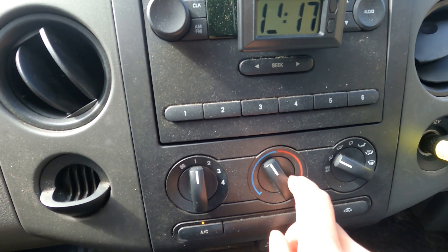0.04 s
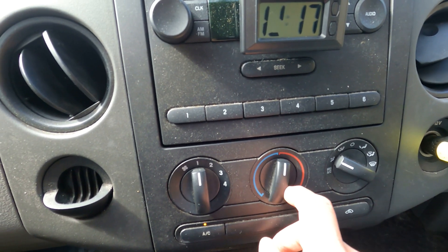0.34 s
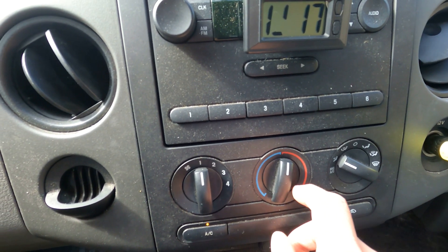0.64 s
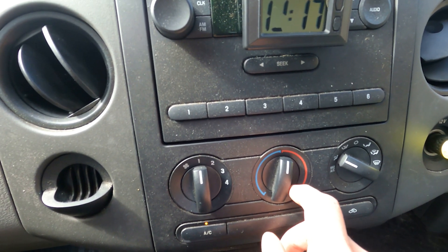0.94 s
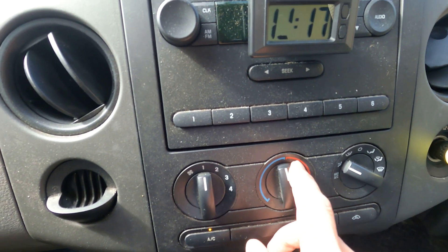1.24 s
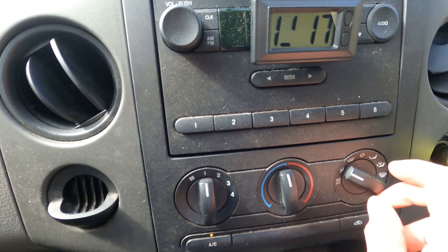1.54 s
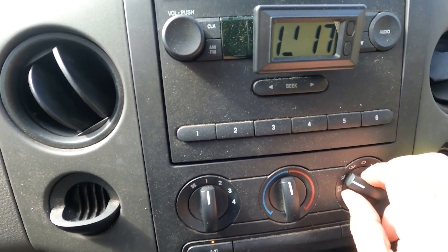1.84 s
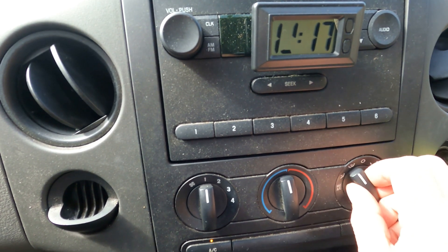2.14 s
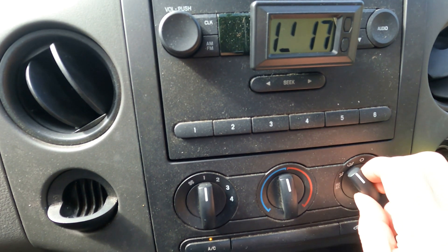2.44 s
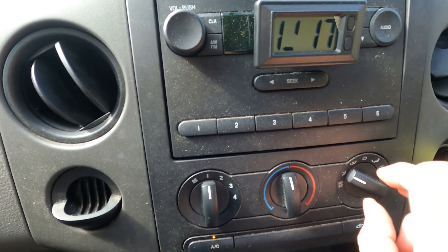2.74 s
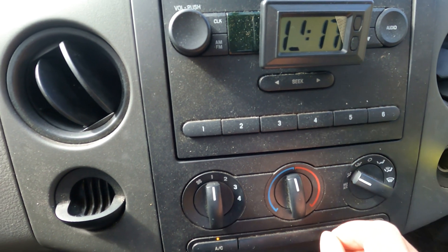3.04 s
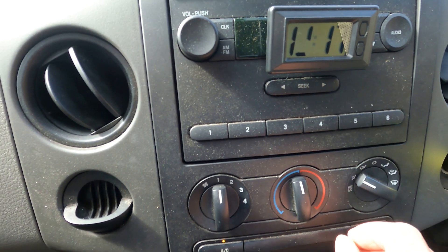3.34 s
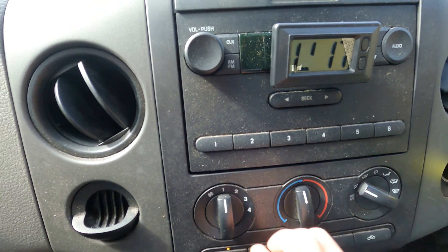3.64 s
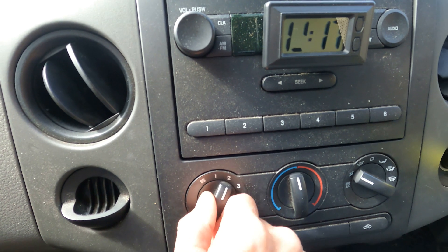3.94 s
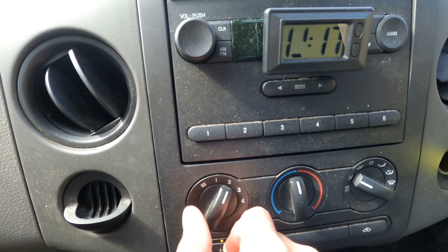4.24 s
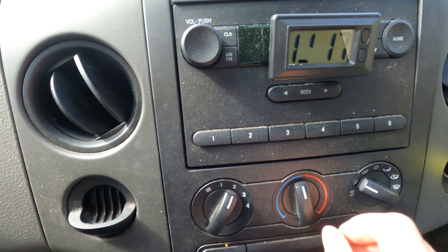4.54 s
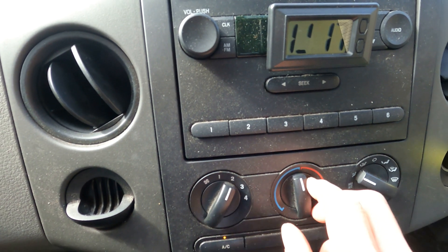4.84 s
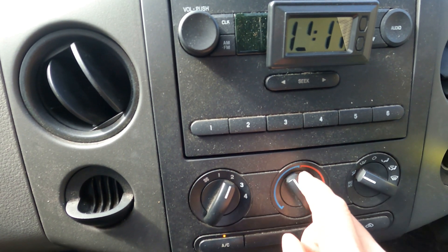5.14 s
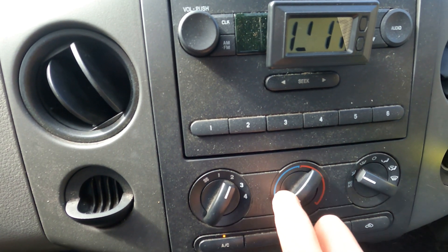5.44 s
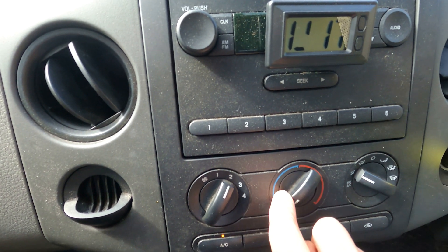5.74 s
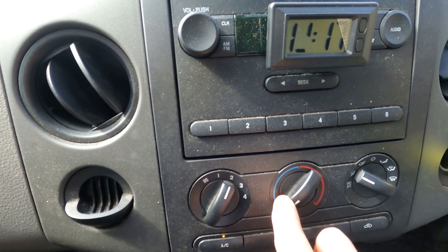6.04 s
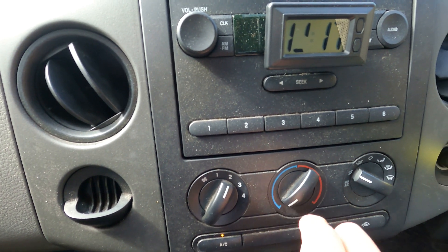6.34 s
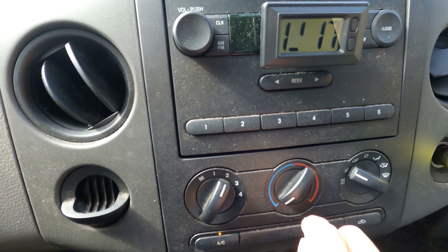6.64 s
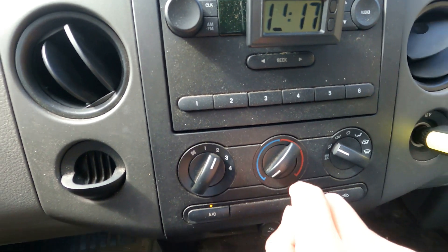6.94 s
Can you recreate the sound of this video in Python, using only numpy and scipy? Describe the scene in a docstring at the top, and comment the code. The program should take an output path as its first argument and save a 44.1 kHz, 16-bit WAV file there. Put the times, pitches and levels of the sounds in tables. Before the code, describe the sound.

Inside a truck cab, an idling engine makes a low, uneven hum under a soft, steady rush of vent air. Close in front, fingers faintly rub and pat plastic dashboard knobs during the first second and a half. A knob clicks lightly over its notches at about 1.7, 2.2 and 2.6 seconds, each click ringing very briefly. At 3.8 seconds the fan switch gives a short creak and a few ticks, then snaps sharply up a step just after 4 seconds. The rush of air grows louder over the next second, with a deeper rumble from the ducts, and stays there. After a light tap at 4.8 seconds and more faint rubbing, the heat knob knocks firmly against its end stop at 5.5 seconds. Two dull hand bumps on the dashboard follow at once. Around 6 seconds the engine hum swells briefly and eases, with the air blowing until the end at about 7 seconds.

```python
"""Inside the cab of an idling eight-cylinder truck, with the air-conditioning blower running.
A hand turns three plastic dashboard knobs: fingers pat and rub, and springs click over notches,
making the knobs ring. The fan switch creaks and snaps up a step, and the rush of air grows as the
blower gathers speed. The heat knob knocks against its end stop and the hand bumps the dashboard.
Underneath, the engine's firing makes a low, uneven hum that swells briefly near the end."""
import sys
import numpy as np
from scipy import signal
from scipy.fft import rfft, irfft
from scipy.io import wavfile

SR = 44100
rng = np.random.default_rng(int(sys.argv[2]) if len(sys.argv) > 2 else 0)


def output_pcm(signal):
    """Save a mono or channel-first signal as 16-bit PCM at the path in sys.argv[1].

    Samples are clipped to [-1, 1] before scaling.
    """
    pcm = np.clip(np.atleast_2d(signal).T, -1, 1) * 32767
    wavfile.write(sys.argv[1], SR, np.round(pcm).astype(np.int16))


N = 308744
T = np.arange(N) / SR
RING_TIME = T[:SR // 5]  # the 0.2 seconds a knock is given to die away


# The notes each knob rings with. Each row: pitch in Hz, relative level in dB, seconds to fade by 60 dB.
KNOB_NOTES = { "fan": [(912, -13, 0.1), (1060, -15, .12), (1230, -3, .042), (1390, -7, 0.055),
              (1965, -1.5, .033), (2230, 0, 0.026), (2480, -15, 0.045), (3700, -11, 0.036),
              (4150, -14, 0.03), (5500, -16, 0.02), (7600, -13, 0.008)], "heat": [(780, -23.5, 0.053),
              (1136, -7, 0.032), (1385, -1, 0.025), (1660, -6, 0.016), (2080, -10, .05),
              (2312, -10.5, 0.025)], "vent": [(1066, -10, 0.12), (1290, 5, 0.025), (1483, 2.5, 0.061),
              (1598, 8.5, 0.017), (1930, 2.5, 0.024), (2350, -3, 0.036), (3380, -3.5, 0.016)]}
# How hard each knob shakes the panel. Each entry: knob, level in dB compared with its own ring.
RATTLE_DB = {"fan": -8, "heat": -12, "vent": -6}
# The tone of the first sharp tick. Each row: frequency in Hz, relative level in dB.
TICK_TONE = [(300, -32), (1200, -4), (2200, -9), (3000, 1), (4200, 2.5), (7800, -10), (8300, -19),
             (12500, -22), (15000, -36)]
# The tone of the rattling panel. Each row: frequency in Hz, relative level in dB.
PANEL_TONE = [(150, -34.5), (550, -5), (900, 4.5), (1250, -1), (1750, 2.5), (2250, 4), (2900, -6),
              (3700, -15), (8000, -39.5), (15000, -42)]
# Notches, rebounds, taps and stops. Each row: start in seconds, knob, ring level in dB,
# tick level in dB, then any notes this hit brings out, as (pitch in Hz, boost in dB).
KNOB_HITS = [ (1.263, "heat", -32, -39.5), (1.730, "vent", -21, -29.5, (1980, 5), (3330, 7)),
             (1.734, "vent", -24.5, -42), (1.802, "vent", -27, -43), (1.876, "vent", -30, -52),
             (2.184, "vent", -28, -32), (2.188, "vent", -18, -22.5), (2.6314, "vent", -28, -34),
             (2.6363, "vent", -25, -33.5), (3.397, "heat", -30.5, -56), (3.838, "fan", -27, -36),
             (3.968, "fan", -22, -28), (3.9745, "fan", -22, -36), (3.979, "fan", -22, -35),
             (4.021, "fan", -21.5, -30), (4.0243, "fan", -18, -26, (1580, 10)), (4.0638, "fan", -4.5, -5.5),
             (4.0698, "fan", -12, -14), (4.0748, "fan", -15, -26), (4.218, "fan", -26, -32.5, (1650, 14)),
             (4.497, "heat", -43, -42.5), (4.795, "heat", -23.5, -37.5), (5.466, "heat", -20.5, -30.5),
             (5.5175, "heat", -18, -22.5), (5.5184, "heat", -2.2, -32), (5.5305, "heat", -17.5, -45)]

def clicks(landing_s=.0006, rattle_lag_s=.002, echo_s=.0105, echo_db=-19, firm_tick_db=-28):
    """A spring ticks over its ridge, the knob lands and rings, and the panel rattles."""
    out = np.zeros((2, N))
    for start, knob, body_db, tick_db, *notes in KNOB_HITS:
        # a gentle hit stays in contact longer, so it rings and ticks duller
        body = ring(KNOB_NOTES[knob], tilt_db=.12 * (body_db + 8))
        body = emphasise(body * undb(body_db) / np.abs(body).max(), notes)
        dulling = [(4500, 0), (12000, .8 * min(tick_db - firm_tick_db, 0))]
        tick = burst(TICK_TONE, fade_s=.009, side_db=-4) * undb(tick_db + 9)
        # the cab scatters the tick into a short, duller tail
        tail = burst(TICK_TONE, fade_s=.07, side_db=-4) * undb(tick_db)
        tail = colour(tail, [(4500, 0), (12000, -5)])
        rattle = burst(PANEL_TONE, fade_s=.075, side_db=-6.5)
        rattle *= np.linalg.norm(body) * undb(RATTLE_DB[knob])
        add(out, colour(sizzle(tick, knob), dulling), start)
        add(out, colour(sizzle(tail, knob), dulling) + rattle, start + rattle_lag_s)
        add(out, body, start + landing_s)
        add(out, body * undb(echo_db), start + landing_s + echo_s)  # off the windscreen
    return out


def ring(notes, tilt_db=0, vary_db=.8):
    """A struck knob rings with fading notes, never twice alike; tilt_db brightens it per octave."""
    luck_db = vary_db * rng.standard_normal(len(notes))
    out = np.zeros(len(RING_TIME))
    for k, (hz, db, fade_s) in enumerate(notes):
        level_db = db + luck_db[k] + tilt_db * np.log2(hz / 1000) - 60 * RING_TIME / fade_s
        direction = (-1) ** k  # neighbouring notes swing against each other
        out += direction * undb(level_db) * np.sin(2 * np.pi * hz * RING_TIME)
    return out


# The tone of a thud on the dashboard. Each row: frequency in Hz, relative level in dB.
THUD_TONE = [(85, -3), (170, -20), (290, 10.5), (400, -9.5), (600, 4.5), (1500, -2.5), (12000, -56)]
# The hand's bumps. Each row: start in seconds, energy in dB.
HAND_BUMPS = [(5.632, -10), (5.732, -12)]

def bumps():
    """The hand bumps the dashboard as it lets go, making dull thuds."""
    out = np.zeros((2, N))
    for start, db in HAND_BUMPS:
        add(out, burst(THUD_TONE, fade_s=.18, side_db=-6) * undb(db), start)
    return out


# The tone of skin on plastic. Each row: frequency in Hz, relative level in dB.
SKIN_TONE = [(400, -39.5), (800, -9), (1200, -3), (2250, -3.5), (3000, -16.5), (4200, -18.5), (7000, -24),
             (8500, -30), (13000, -34), (15000, -52)]
# Fingertips landing. Each row: start in seconds, level in dB, treble change in dB.
FINGER_PATS = [(.489, -18, -22), (.590, -22, -2), (1.443, -14.5, -38), (1.669, -16.5, -15)]

def pats():
    """The pad of a finger settles on plastic with a brief, soft pat."""
    out = np.zeros((2, N))
    for start, db, treble_db in FINGER_PATS:
        pat = burst(SKIN_TONE, fade_s=.07, side_db=-6, rise_s=.003)
        add(out, colour(pat, [(1500, 0), (12000, treble_db)]) * undb(db), start)
    return out


# Finger strokes. Each row: firmest moment in seconds, knob, half the length in seconds, level in dB,
# treble slope in dB per octave, then any squeaks, as (pitch in Hz, boost in dB).
FINGER_RUBS = [ (0.04, "heat", 0.14, -55, -0.7, (6850, 7)), (0.2, "heat", 0.11, -49, -1.2, (7000, 13)),
               (1.335, "heat", 0.07, -46, -1.7, (2090, 8), (3350, 10)), (1.778, "vent", 0.19, -45.5, -1),
               (1.914, "vent", 0.11, -44.5, -2, (11600, 11)), (1.956, "vent", 0.09, -39, -2),
               (2.152, "vent", 0.074, -49.5, -1.8), (2.298, "vent", .15, -58.5, 1.7, (3270, 14)),
               (2.594, "vent", .05, -53, -.7), (2.713, "vent", 0.12, -49, -.2),
               (3.955, "fan", 0.11, -45, -.5), (4.053, "fan", .035, -40, 0),
               (4.057, "fan", 0.25, -40, -2.5), (4.826, "heat", 0.15, -50.5, -3),
               (5.282, "heat", 0.15, -45, -2), (5.428, "heat", 0.16, -46.5, -1.1, (6750, 6), (12000, 11)),
               (5.488, "heat", 0.09, -37, -3.9), (5.6, "heat", 0.28, -52, -3)]

def rubs(swell_share=.42, slips_per_s=8000, scatter_db=3.5, drag_db=2):
    """Skin sticks and slips over the plastic in short strokes; some grips squeak thinly."""
    grain = spread(slips(slips_per_s, scatter_db), slips(slips_per_s, scatter_db), side_db=-3)
    skin = unit(colour(grain, SKIN_TONE)) * undb(drag_db * wander(55))  # the finger drags unevenly
    out = np.zeros((2, N))
    for firmest_s, knob, half_s, db, tilt_db, *squeaks in FINGER_RUBS:
        progress = (T - firmest_s) / (2 * half_s) + swell_share
        during = np.flatnonzero((progress > 0) & (progress < 1))
        # the finger presses in, then eases off more slowly
        press = np.sin(np.interp(progress[during], [0, swell_share, 1], [0, np.pi / 2, np.pi])) ** 6
        stroke = colour(skin[:, during] * press, [(1500, 0), (12000, 3 * tilt_db)])
        stroke = sizzle(emphasise(stroke, squeaks, q=28), knob)
        add(out, dashboard_echoes(stroke) * undb(db), T[during[0]])
    return out


# The notes of the fan knob's loose cap. Each row: pitch in Hz, relative level in dB.
CAP_NOTES = [(915, 0), (1170, 0), (1310, -2), (1830, -1), (2050, 0), (2305, 1.5), (7520, -24)]

def creak(start_s=3.837, attack_s=.0039, hold_s=.051, release_s=.034, ease_db_per_s=100):
    """Quick slips on the shaft keep the fan knob's cap ringing as it is gripped."""
    shaft = slips(per_s=4100, scatter_db=4.5)
    cap_ring = ring([(hz, db, .14) for hz, db in CAP_NOTES])
    cap = unit(signal.fftconvolve(shaft, cap_ring)[:N])
    scrape = unit(sizzle(colour(shaft, SKIN_TONE), "fan"))
    age = np.maximum(T - start_s, 0)
    attack = np.minimum(age / attack_s, 1)
    release = np.clip(1 - (age - hold_s) / release_s, 0, 1)
    grip = attack * undb(-28.5 - ease_db_per_s * age) * release
    return grip * (undb(-3) * cap + undb(-8) * scrape)


# Each knob's sizzle; the stiff fan switch has the least. Each entry: knob, change in dB.
SIZZLE_DB = {"fan": -6, "heat": 3, "vent": 3}

def sizzle(x, knob):
    """Lift or cut a knob's sharp sounds above about 8000 Hz."""
    return colour(x, [(8100, 0), (8800, SIZZLE_DB[knob])])


def dashboard_echoes(x, fade_s=.016, db=-7):
    """Quick echoes between hand, knob and dashboard colour the sound, differently left and right."""
    early = RING_TIME[:SR // 100]
    echoes = rng.standard_normal((2, len(early))) * undb(-60 * early / fade_s)
    echoes = colour(spread(*echoes, side_db=-3.5), [(800, -5), (3000, -8)])
    echoes = unit(echoes) / np.sqrt(len(early)) * undb(db)
    reflected = signal.fftconvolve(x, echoes, axes=-1)[:, :x.shape[-1]]
    return (x + reflected) / np.hypot(1, undb(db))


# Vent air on the slow and the fast fan step. Each row: frequency in Hz, relative level in dB.
SLOW_AIR_TONE = [(380, -18.5), (520, -13), (620, -18.5), (740, -16.5), (850, -20), (1060, -9.5),
                 (1400, -14.5), (1800, -23), (2300, -20), (2900, -39.5), (6000, -45), (7600, -51),
                 (9000, -64)]
FAST_AIR_TONE = [(380, -17), (520, -6.5), (620, -11), (790, -4), (860, -7.5), (1000, -1), (1400, -11.5),
                 (1800, -11), (2300, -17), (2900, -32), (3800, -39.5), (6000, -44.5), (7400, -48),
                 (9000, -62)]
# The rumble of the ducts and the cab. Each row: frequency in Hz, relative level in dB.
RUMBLE_TONE = [(5, -6.5), (14, 2), (24, -1.5), (35, -12.5), (62, -20.5), (80, -16.5), (100, -9), (122, -16),
               (230, -17), (320, -20.5), (450, -37), (900, -66)]

def blower(step_s=4.07, lag_s=.68, slow_db=-51.5, fast_db=-44):
    """Air rushes through the vents; as the fan wheel speeds up, it also buffets the ducts."""
    speedup = settle(step_s, lag_s)
    slow = rush([(120, -37.5)] + SLOW_AIR_TONE + [(15000, -65)], side_db=4)
    fast = rush([(120, -37.5)] + FAST_AIR_TONE + [(15000, -65)], side_db=4)
    air_db = slow_db + speedup * (fast_db - slow_db) + .5 * wander(9.4)
    air = (np.sqrt(1 - speedup) * slow + np.sqrt(speedup) * fast) * undb(air_db)
    buffet_tone = [(55, -39.5), (66, -24), (79, 9.5), (100, 2), (125, -7.5), (220, -11), (900, -77.5)]
    buffet = undb(-46.5) * np.sqrt(speedup) * rush(buffet_tone, side_db=-8)
    rumble = undb(-45.5) * rush(RUMBLE_TONE + [(3000, -100)], side_db=-.5)
    return air + buffet + rumble


# The uneven exhaust beat. Each entry: vibrations per round of eight firings, level in dB.
EXHAUST_BEAT = {3: -35, 5: -48, 9: -57, 11: -63, 16: -60}

def engine(idle_hz=43.3, load_s=5.9, sag_hz=.3, swell_db=5.5, pump_hz=133.7, pump_fade_db_per_s=9.5):
    """Eight cylinders fire in a low, uneven hum, and a belt-driven pump hums above them."""
    # the engine takes up more load: its note sags and swells, then eases back
    load = settle(load_s, .04) * (1 - settle(load_s, 1.3)) ** 2
    firing_hz = idle_hz - sag_hz * load + .12 * wander(1.5)
    cycle = phase(firing_hz / 8)
    out = undb(-40 + swell_db * load + .9 * wander(4)) * np.sin(8 * cycle)
    for multiple, db in EXHAUST_BEAT.items():
        out += undb(db + wander(5.1)) * np.sin(multiple * cycle + rng.uniform(0, 2 * np.pi))
    pump = np.sin(phase(pump_hz + .82 * wander(1.53)))
    pump_db = -54 - pump_fade_db_per_s * np.maximum(T - load_s, 0)  # sinks away under the load
    out += undb(pump_db + wander(5.3)) * pump
    return np.sqrt(2) * out


def whistle(hz=1067, width_hz=18, db=-68):
    """Air passing over the vent slats makes a faint, unsteady tone."""
    strength = np.sqrt(2) * undb(db) * wander(width_hz)
    return strength * np.sin(phase(hz + width_hz * wander(20)))


def burst(tone, fade_s, side_db, rise_s=.0005):
    """A flurry of small vibrations with a total energy of 1, dying by 60 dB in fade_s."""
    fade = undb(-60 * RING_TIME / fade_s) * (1 - np.exp(-RING_TIME / rise_s))
    noise = rng.standard_normal((2, len(RING_TIME))) * fade
    return unit(colour(spread(*noise, side_db), tone)) / np.sqrt(len(RING_TIME))


def slips(per_s, scatter_db):
    """A surface sticks and lets go, over and over, in tiny jolts of random size."""
    chance, size = rng.random(N), rng.standard_normal((2, N))
    return (chance < per_s / SR) * np.sign(size[0]) * undb(scatter_db * size[1])


def rush(tone, side_db):
    """Swirling air: steady stereo noise with the given tone."""
    return unit(colour(spread(*rng.standard_normal((2, N)), side_db), tone))


def spread(mid, side, side_db):
    """Make left and right: alike in the bass, further apart in the treble."""
    side = colour(side, [(100, -26.5), (300, -20), (1200, -14.5), (3000, -4.5), (12000, -9.5)])
    side *= undb(side_db)
    return np.array([mid + side, mid - side])


def emphasise(x, notes, q=17):
    """Bring out notes, each (pitch in Hz, boost in dB); a higher q makes them narrower."""
    return x + sum(undb(db) * signal.lfilter(*signal.iirpeak(hz, q, fs=SR), x) for hz, db in notes)


def colour(x, tone):
    """Shape a sound's bass and treble to follow rows of (Hz, dB)."""
    size = x.shape[-1]
    cepstrum = irfft(np.log(undb(across(tone, size))), size)
    # fold the filter so that it rings after a hit, not before
    cepstrum[1:size // 2] *= 2
    cepstrum[size // 2 + 1:] = 0
    return irfft(rfft(x) * np.exp(rfft(cepstrum)), size)


def across(points, size):
    """Fill in rows of (Hz, value) for every frequency in a sound of this size."""
    hz, value = np.transpose(points)
    return np.interp(np.log(np.arange(size // 2 + 1) * SR / size + 1), np.log(hz), value)


def wander(turns_per_s):
    """A random drift, mostly between -1 and 1."""
    points = rng.standard_normal(1024)
    return np.interp(T * turns_per_s, np.arange(len(points)), points)


def settle(start_s, lag_s):
    """Glide from 0 towards 1, as something heavy follows a switch."""
    return 1 - np.exp(-np.maximum(T - start_s, 0) / lag_s)


def phase(hz):
    """The running angle of a wave whose pitch changes."""
    return 2 * np.pi * np.cumsum(hz) / SR


def add(out, x, start_s):
    """Mix a short sound in at the given time."""
    i = max(int(start_s * SR), 0)
    out[:, i:i + x.shape[-1]] += x[..., :N - i]


def undb(db):
    """Turn decibels into a number to multiply by."""
    return 10 ** (np.asarray(db) / 20)


def unit(x):
    """Scale a sound to an average (rms) level of 1."""
    return x / np.sqrt(np.mean(x ** 2))


# How far the knobs' sound on the left runs ahead of the right.
# Each row: frequency in Hz, lead in radians (below zero, the left lags).
LEFT_LEAD = [(100, 0), (1300, -.35), (2300, -1), (3000, -1.1), (5250, .5), (6700, -1), (9400, .6),
             (14000, 1.3)]

def scene():
    """The knobs sound from close in front; blower and engine fill the cab."""
    knobs = clicks() + bumps() + pats() + rubs() + creak()
    sides = np.array([[.5], [-.5]])  # left, right
    placement = np.exp(1j * sides * across(LEFT_LEAD, N)) * undb(sides * 1.1)
    cab = (engine() + blower() + whistle()) * undb(sides * -.4)
    return cab + irfft(rfft(knobs) * placement, N)


def record(dry):
    """Fade quickly in and out, and cut the treble above 15500 Hz."""
    fade = np.clip(np.minimum(T, T[-1] - T) / .004, 0, 1)
    treble_cut = signal.ellip(10, .2, 80, 15500, fs=SR, output="sos")
    return signal.sosfilt(treble_cut, dry * fade)


dry = scene()
out = record(dry)
output_pcm(out)
```